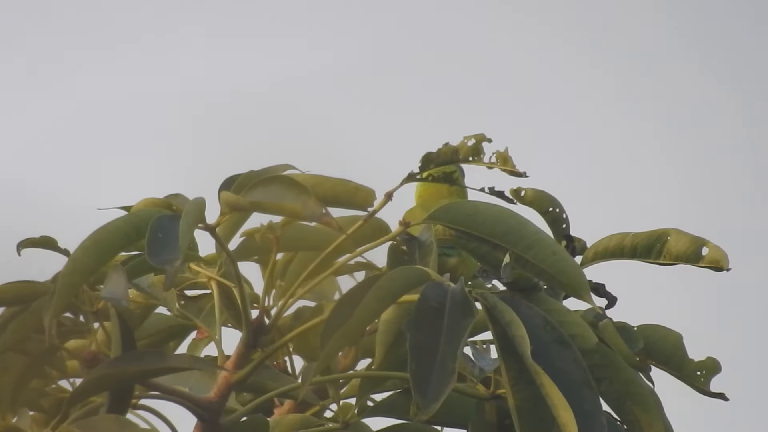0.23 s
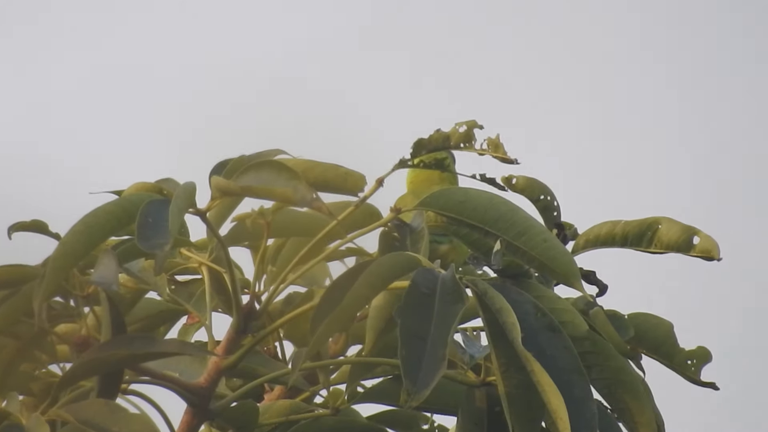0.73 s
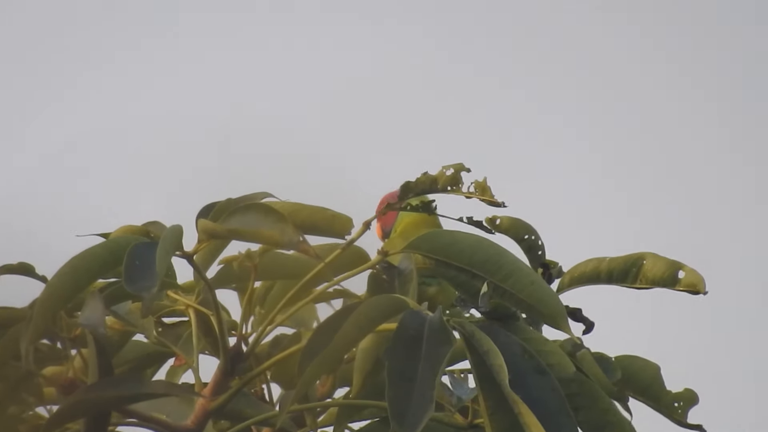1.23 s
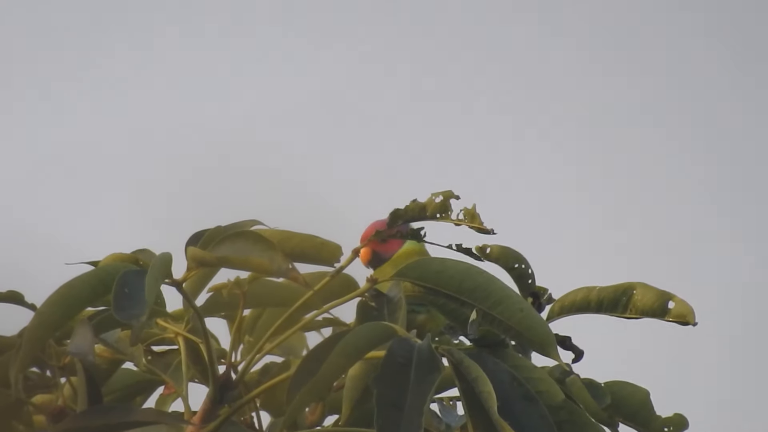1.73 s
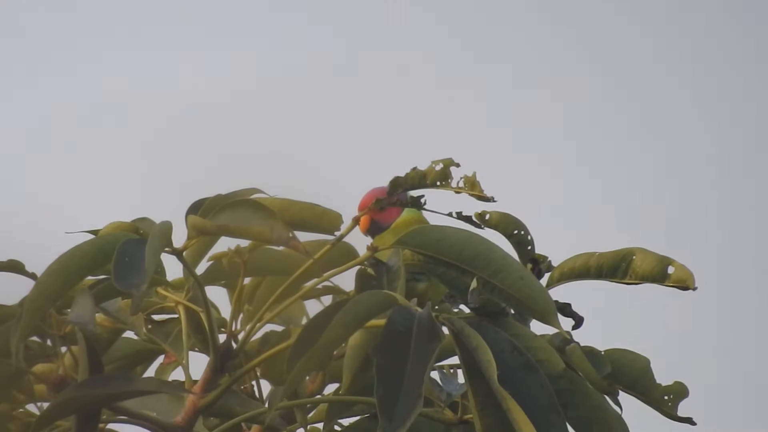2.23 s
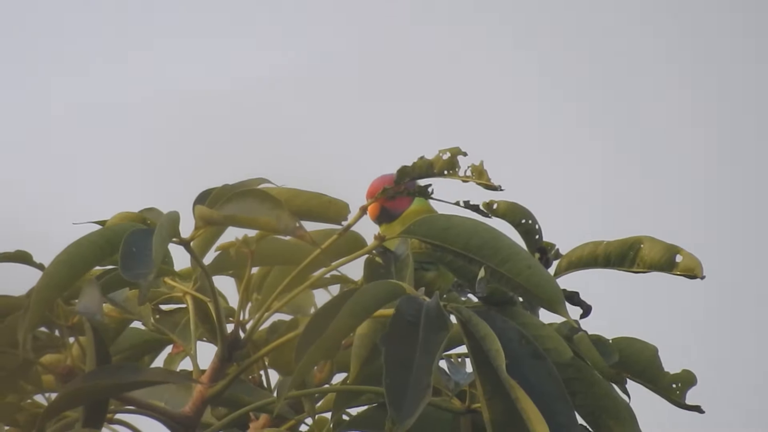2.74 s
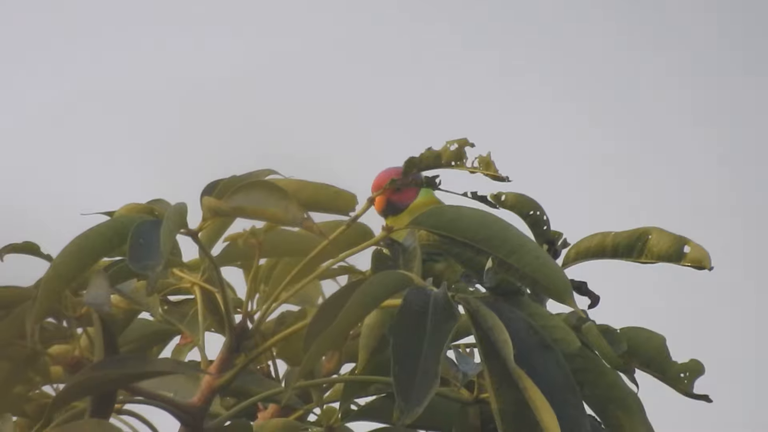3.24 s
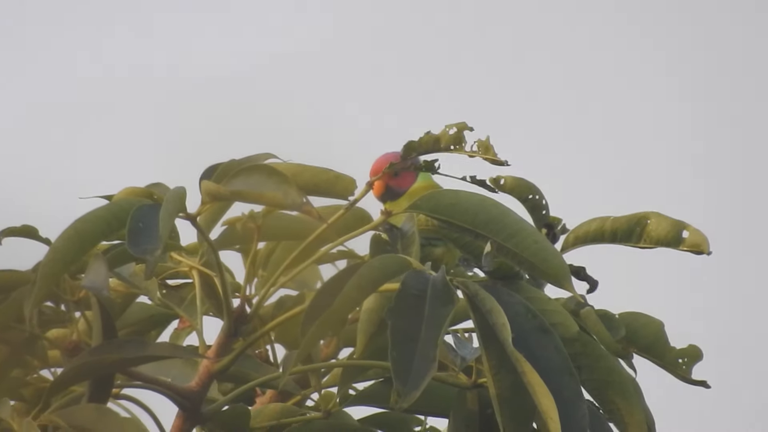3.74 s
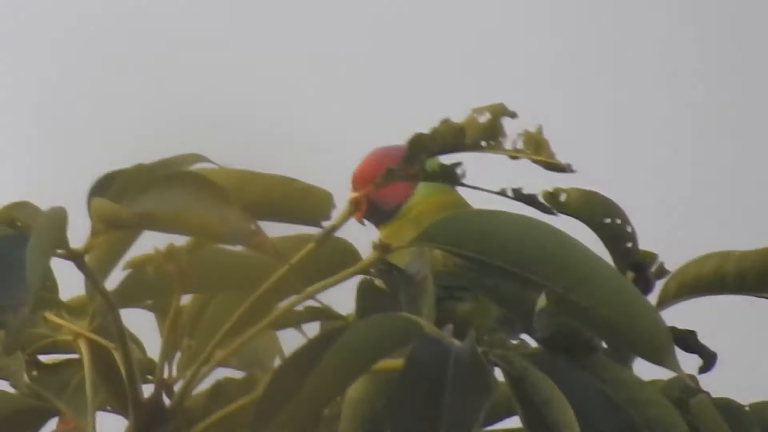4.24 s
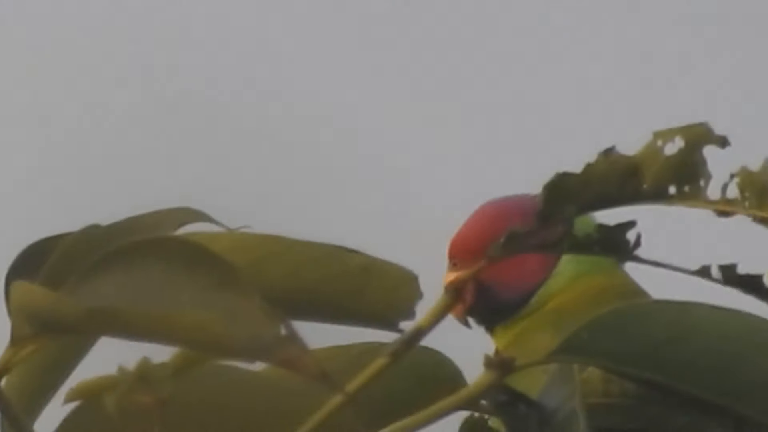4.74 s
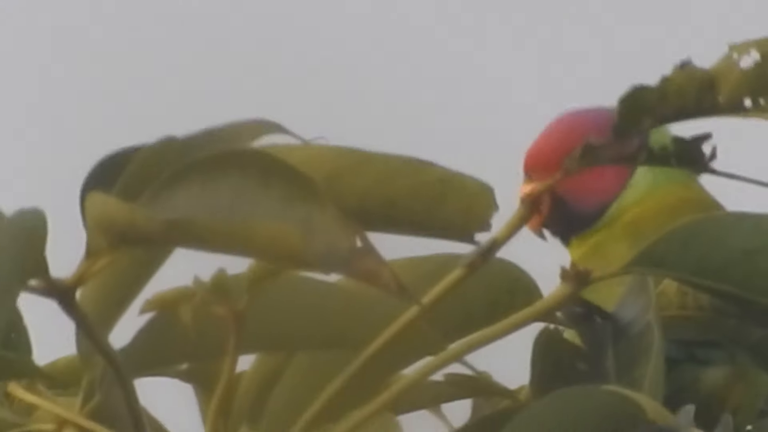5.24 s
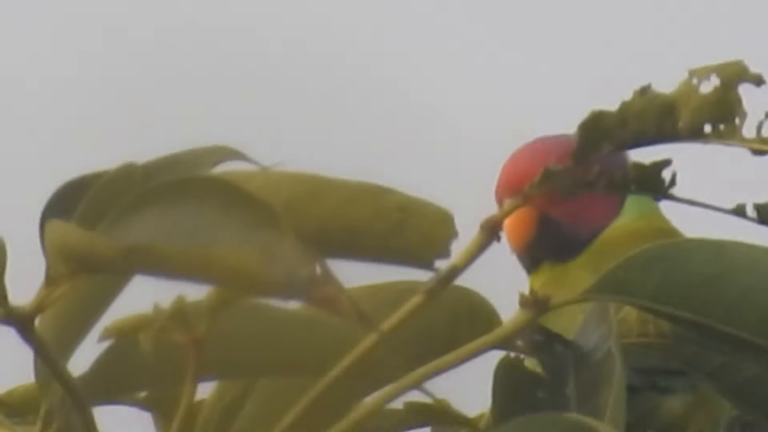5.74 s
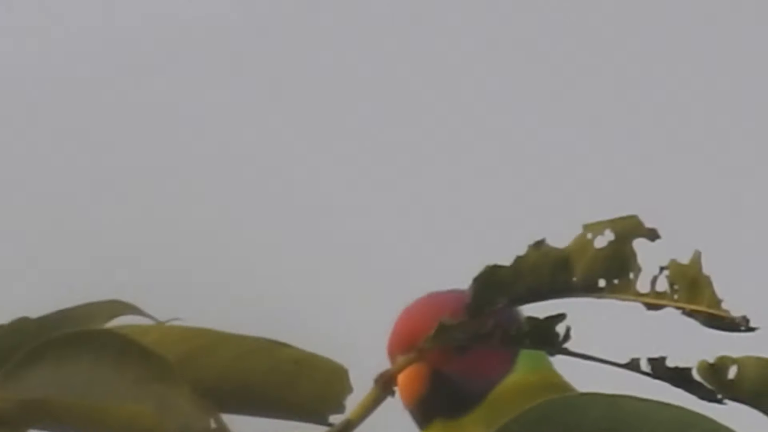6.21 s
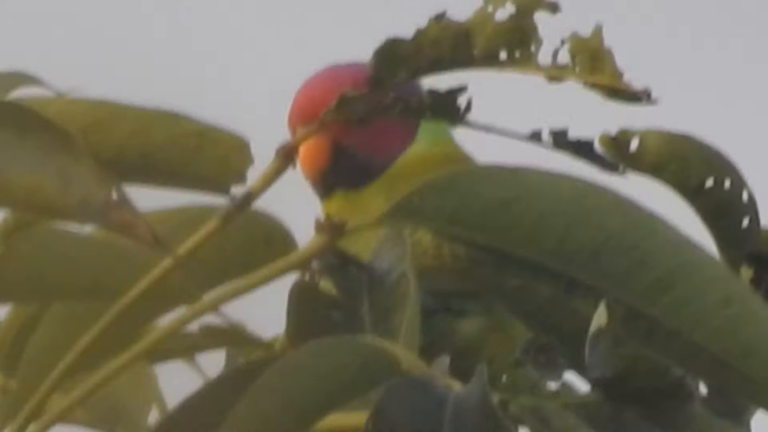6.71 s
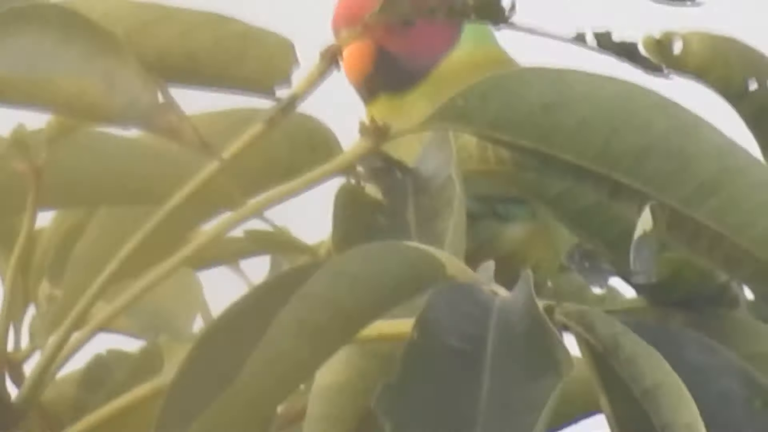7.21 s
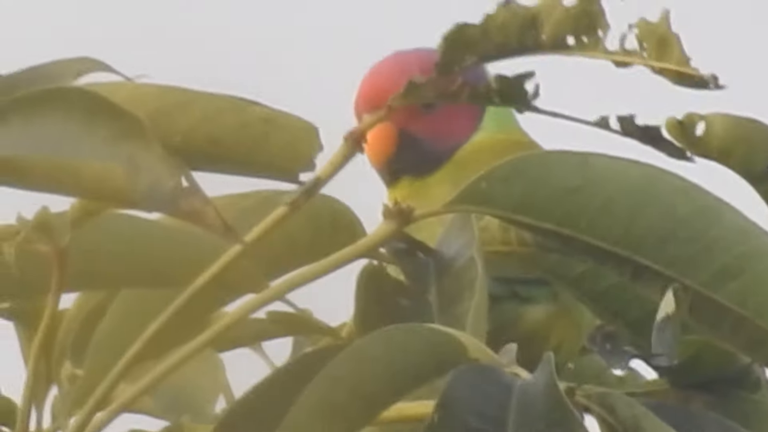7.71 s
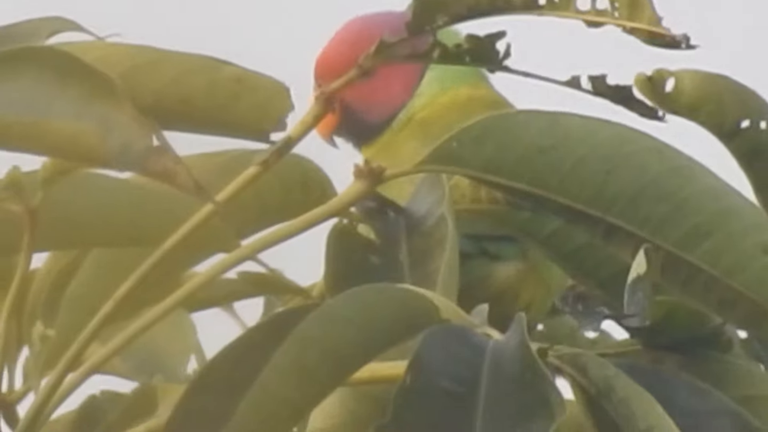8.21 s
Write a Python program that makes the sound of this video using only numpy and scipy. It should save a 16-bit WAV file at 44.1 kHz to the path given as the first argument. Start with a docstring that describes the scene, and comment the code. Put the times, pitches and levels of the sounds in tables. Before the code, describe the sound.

A parakeet calls from a leafy treetop, its short, sharp, rising cries close and fairly dry. A songbird whistles farther off at the start. After one single cry, the cries come mostly in pairs, the second louder, with soft nasal notes, mews and tiny beak clicks between them. Near the end, more distant parakeets reply. Faint chirps, insects and a quiet outdoor hush continue underneath.

```python
"""Parakeets in a treetop. A songbird whistles farther off; at 0.5 s comes the first close cry, the syrinx
swooping up and breaking twice into higher registers. From 2 s the cries come mostly in pairs, the second
forced harder, among distant whines, then soft mews, beak clicks and nasal notes. Near 5 s a bird warbles
twice; from 6.6 s farther parakeets reply. Throughout, foliage scatters every call over faint chirps,
insects and a quiet outdoor hush."""
import sys
import numpy as np
from scipy import signal
from scipy.fft import rfft, irfft, next_fast_len
from scipy.io import wavfile
from scipy.ndimage import map_coordinates

SR = 44100
rng = np.random.default_rng(int(sys.argv[2]) if len(sys.argv) > 2 else 0)


def unload_wav(signal):
    """Save mono or channel-first audio to the path in sys.argv[1] as 16-bit WAV at rate SR, clipped to [-1, 1]."""
    wavfile.write(
        sys.argv[1],
        SR,
        np.round(np.clip(np.atleast_2d(signal).T, -1, 1) * 32767).astype(np.int16),
    )


N = 373086

# close cries (start [s], level [dB], effort [0-1])
CRIES = [(0.456, -10, .05), (2.162, -10, 0), (2.391, -8, 1), (3.865, -10.5, .05), (4.112, -7, 0.94),
         (5.155, -10.5, 0), (5.299, -7.5, 0.99), (6.215, -14.5, 0.4), (6.388, -11, .05), (6.408, -7, 0.81)]
# farther cries (start [s], low register [s], middle register [s], level [dB])
REPLIES = [(6.632, .060, .028, -31.5), (6.908, 0.027, 0.064, -32.5), (7.210, 0.024, .059, -30.5),
           (7.229, 0.032, .037, -36), (7.532, .061, 0.031, -29), (7.875, 0.027, 0.064, -36)]
# parakeet throat and beak response (frequency [Hz], gain [dB])
THROAT = [(900, -33.5), (1700, -19), (2400, -13.5), (2900, -2), (3400, -0.5), (4000, 0), (4500, -2),
          (5300, -1), (6200, -7), (7300, -6.5), (9100, -12.5), (10200, -8.5), (11000, -14.5),
          (12200, -35.5)]
# nasal notes, mews, whines, warbles, thin high whistles (start [s], length [s], pitch [Hz], level [dB])
NASALS = [(3.370, 0.16, 1598, -32), (3.729, 0.16, 1620, -30), (4.120, 0.17, 1644, -30.5),
          (4.507, 0.17, 1642, -29.5), (6.710, 0.16, 1591, -31.5), (7.087, 0.17, 1634, -30)]
MEWS = [(3.005, .128, 1444, -37.5), (6.155, 0.11, 1422, -35.5)]
WHINES = [(2.575, 0.17, 1117, -33.5), (5.720, 0.18, 1076, -34.5)]
WARBLES = [(4.708, 0.092, 2754, -38.5), (4.890, 0.093, 2830, -36.5)]
SEEPS = [(.965, .085, 6150, -57), (1.235, .11, 5650, -55), (3.195, .11, 6300, -56.5),
         (4.838, .085, 6250, -52.5), (5.122, .07, 6150, -55), (8.328, .09, 6350, -52)]
# their contours (position [0-1], pitch [ratio], gain [dB])
NASAL_SHAPE = [(0, 1.05, -8.5), (.08, 0.985, -0.5), (.3, 1.035, -2), (0.599, 1.085, -6.5), (.9, 1.112, -12),
               (1, 1.122, -18.5)]
MEW_SHAPE = [(0, .88, -6), (.14, 1.01, -1), (.3, .92, -5.5), (.44, 1.05, -8.5), (.9, 1.08, -16.5),
             (1, 0.87, -15.5)]
WHINE_SHAPE = [(0, 0.86, -12.5), (0.22, 1, -2), (.55, 1.002, -4.5), (.8, .975, -8.5), (1, .95, -17)]
WARBLE_SHAPE = [(0, 0.91, -18), (.1, 1.02, -5.5), (.25, .97, -1), (.46, 1.085, -0.5), (.68, .9, -7.5),
                (.88, .97, 0), (1, 0.73, -16)]
SEEP_SHAPE = [(0, 1, -8.5), (.22, .99, 1.5), (.55, .93, -5.5), (1, 0.84, -9)]
# harmonics, fundamental first (gain [dB])
NASAL_TONE_DB = [-10, -2.5, -4.5, -4.5, -18, -23.5, -30]
MEW_TONE_DB = [-12, -2, -5.5, -2, -6.5, -22]
WHINE_TONE_DB = [-13.5, -5, -0.5, -9, -13, -17]
# beak clicks (time [s], level [dB])
CLICKS = [(2.994, -39.5), (4.956, -41), (6.141, -38), (7.067, -42.5)]
# songbird phrase (offset [s], length [s], first [Hz], middle [Hz], last [Hz], level [dB], trill [Hz])
PHRASE_NOTES = [(0, 0.027, 2860, 3230, 3650, -34, 125), (0.061, 0.018, 2600, 2440, 3600, -37, -2),
                (0.09, 0.0292, 4160, 4020, 4100, -35.5, 0), (0.112, .036, 4100, 4140, 4200, -45, 280)]
# phrase entries (start [s], gain [dB], swell by the last note [dB])
PHRASES = [(.188, -2, 2.5), (.644, 4, -8.5)]
# downward chirps (start [s], top pitch [Hz], level [dB])
FLICKS = [(.104, 4600, -48.5), (.614, 3060, -38), (1.870, 2750, -50), (3.474, 2450, -49),
          (3.624, 2700, -48.5)]
# slurred whistles (start [s], length [s], first [Hz], last [Hz], level [dB], trill [Hz])
SLURS = [(.050, 0.063, 2550, 3630, -53.5, 10), (0.113, 0.076, 2630, 2560, -47, 10),
         (0.263, .044, 1880, 1440, -46, 10), (0.304, 0.033, 1760, 1980, -44.5, 410),
         (0.444, .062, 2750, 2460, -26, 42), (1.770, 0.041, 2510, 2790, -54, 150),
         (1.920, 0.11, 2900, 3020, -55, 150), (2.338, 0.045, 2580, 2670, -42, 260),
         (2.366, 0.067, 2480, 2320, -28, 70), (2.544, 0.043, 1870, 2250, -37, 110),
         (2.567, 0.084, 1996, 1670, -31, 116), (5.054, 0.065, 1940, 2240, -48.5, 200),
         (5.584, 0.064, 2350, 2150, -46, 5), (7.490, 0.069, 2580, 2500, -52, 5)]
# foliage decay (frequency [Hz], T60 [s])
FOLIAGE_T60 = [(1000, 0.4), (3500, 0.4), (5500, 0.48), (8000, .35), (12000, .2)]
# outdoor hush spectrum (frequency [Hz], relative density [dB])
HUSH_SPECTRUM = [(20, -4), (45, -7.5), (100, -12), (190, -14.5), (340, -21), (690, -24), (1400, -28),
                 (3000, -32.5), (5500, -34.5), (8000, -37.5), (11000, -42), (15500, -42)]

SWOOP_HZ, REPLY_SWOOP_HZ = 2417, 1663  # top of the swoop
SWOOP_S, LOW_S, MIDDLE_S, WHISTLE_S = .021, .036, .058, .033  # stages of an easy cry
REPLY_SWOOP_S, REPLY_WHISTLE_S, REPLY_BUILD_DB_PER_S = .029, .04, 93
FLICK_S, FLICK_RATIO = .017, .62  # ratio: last pitch over first
SLUR_EASE = .64  # share of the glide done at half time
HUSH_DB, TOP_HZ = -46.5, 15780


def cry(times_s, swoop_hz, levels_db, swell_db, mellow_db_oct, dulling, rasp_db, jitter):
    """The syrinx swoops up in a buzzy register, then breaks twice into higher, purer ones."""
    start, swoop, break1, break2, end = times_s
    low_db, middle_db, whistle_db = levels_db
    t = clock(end - start)
    n, jump_s = len(t), .0006
    shift_hz = swoop_hz - SWOOP_HZ
    # (time [s], pitch [Hz], level [dB], overtone slope [dB/octave])
    stages = np.array([
        (start, 900, low_db - swell_db, -9),
        (start + .6 * (swoop - start), .66 * swoop_hz - .12 * shift_hz, low_db - .93 * swell_db, -6),
        (swoop, swoop_hz, low_db + .5, -2.5),
        (break1 - .006, 2930 + .35 * shift_hz, low_db, -3.5),
        (break1 - jump_s, 3120 + .6 * shift_hz, low_db, -7),
        (break1 + jump_s, 3340, middle_db, -10),
        (break1 + .69 * (break2 - break1), 3790, middle_db - 1, -12),
        (break2 - .006, 4250, middle_db - 1.5, -10),
        (break2 - jump_s, 4330, middle_db - 17.5, -12),
        (break2 + jump_s, 5050, whistle_db, -12),
        (break2 + .11 * (end - break2), 5120, whistle_db - 2.5, -12),
        (break2 + .21 * (end - break2), 5430, whistle_db, -15),
        (break2 + .78 * (end - break2), 5490, whistle_db - 10, -16),
        (end, 5450, whistle_db - 21.5, -16)])
    pitch_hz, level_db, slope = (np.interp(start + t, stages[:, 0], column) for column in stages.T[1:])
    pitch_hz *= 1 + jitter * wobble(n, 250) + .0081 * wobble(n, 2500)
    k = np.arange(1, 7)[:, None]
    flutter_db = 2.8 * np.minimum(k - 1, 1) * np.array([wobble(n, 153.4) for _ in k])
    rolloff_db = slope * np.log2(k) - mellow_db_oct * np.log2(np.maximum(k / 2, 1))
    voice = harmonics(pitch_hz, along(THROAT, k * pitch_hz) + rolloff_db + flutter_db)
    # air rasps through the syrinx, fading after the last break
    rasp = noise(n, [(300, -8), (1500, -6), (3500, -3.5), (7500, -2.5), (11000, -10), (15000, -16.5)])
    rasp *= amp(rasp_db + np.interp(start + t, [break2, end], [0, -10]))
    sound = (voice + rasp) * amp(level_db + 1.46 * wobble(n, 152.5))
    # leaves in the way dull a far bird
    sound = filtered(sound, lambda hz: amp(dulling * along([(4500, -.034), (6500, -.9)], hz)))
    return sound * fade(t, .003)


def near_stages(start_s, db, effort):
    """Close cry: effort brings the first break forward and makes the whistle longer and louder."""
    swoop = start_s + SWOOP_S
    break1 = swoop + LOW_S - .003 * effort
    break2 = swoop + LOW_S + MIDDLE_S
    end = break2 + WHISTLE_S + .013 * effort
    low_db, whistle_db = db - 5.5 + .5 * effort, db - 15 + 10 * effort
    return (start_s, swoop, break1, break2, end), SWOOP_HZ, (low_db, db, whistle_db)


def reply_stages(start_s, low_s, middle_s, db):
    """Reply: a slower, lower swoop; the longer the low register, the louder it is."""
    times_s = start_s + np.cumsum([0, REPLY_SWOOP_S, low_s, middle_s, REPLY_WHISTLE_S])
    low_db = db - 1.5 + REPLY_BUILD_DB_PER_S * (low_s - REPLY_SWOOP_S)
    return times_s, REPLY_SWOOP_HZ, (low_db, db, db - 2)


def parakeets(calls, spread_s, scatter_db, **voice):
    """Cries from one distance, each scattered on its own."""
    out = np.zeros(N)
    for times_s, swoop_hz, levels_db in calls:
        add(out, times_s[0], scatter(cry(times_s, swoop_hz, levels_db, **voice), spread_s, scatter_db))
    return out


def bird_notes(rows, shape, tone_db, tilt_db_oct, jitter, quaver=0, quaver_hz=85):
    """Notes on one contour; upper overtones and quaver die away as the pressure drops."""
    out = np.zeros(N)
    position, ratio, contour_db = np.transpose(shape)
    octaves = np.log2(np.arange(1, len(tone_db) + 1))[:, None]
    for start_s, length_s, hz, db in rows:
        t = clock(length_s)
        u = t / length_s
        shake = quaver * np.sin(2 * np.pi * quaver_hz * t) + jitter * wobble(len(t), 900)
        pitch_hz = hz * np.interp(u, position, ratio) * (1 + shake * np.clip(3.8 * (.62 - u), .08, 1))
        flutter_db = .99 * octaves * np.array([wobble(len(t), 60) for _ in tone_db])
        partials_db = np.array(tone_db)[:, None] - tilt_db_oct * u * (octaves - 1) + flutter_db
        envelope = amp(db + np.interp(u, position, contour_db) + .83 * wobble(len(t), 70))
        add(out, start_s, harmonics(pitch_hz, partials_db) * envelope * fade(t, .0035))
    return out


def beak_clicks():
    """Tiny dry bursts of noise."""
    out, t = np.zeros(N), clock(.03)
    for time_s, db in CLICKS:
        burst = noise(len(t), [(600, -25), (1700, 5), (7000, -1.5), (11000, -25)])
        add(out, time_s - .002, burst * amp(db - 60 * t / .038) * fade(t, .002))
    return out


def songbirds(rows, trill_rate_hz=135):
    """Pure gliding whistles, some with a fast trill."""
    out = np.zeros(N)
    for start_s, length_s, *pitches_hz, db, trill_hz in rows:
        t = clock(length_s)
        glide_hz = np.polyval(np.polyfit([0, .5, 1], pitches_hz, 2), t / length_s)
        pitch_hz = glide_hz * (1 + .011 * wobble(len(t), 330))
        pitch_hz += trill_hz * np.sin(2 * np.pi * trill_rate_hz * t)
        envelope = amp(db + 2 * wobble(len(t), 150)) * fade(t, .26 * length_s)
        add(out, start_s, np.sin(2 * np.pi * np.cumsum(pitch_hz) / SR) * envelope)
    return out


def song():
    """Songbird rows: the repeated phrase, falling flicks, slurs that level off."""
    phrases = [(start_s + s, length_s, *pitches_hz, gain_db + db + swell_db * s / PHRASE_NOTES[-1][0], trill)
               for start_s, gain_db, swell_db in PHRASES
               for s, length_s, *pitches_hz, db, trill in PHRASE_NOTES]
    flicks = [(s, FLICK_S, hz, hz * np.sqrt(FLICK_RATIO), hz * FLICK_RATIO, db, 0)
              for s, hz, db in FLICKS]
    slurs = [(s, length_s, first, first + SLUR_EASE * (last - first), last, db, trill)
             for s, length_s, first, last, db, trill in SLURS]
    return phrases + flicks + slurs


def twitter(base_db, count=34):
    """Songbird rows: faint random chirps deep in the trees."""
    draws = rng.uniform([.5, .012, 1504.5, -.18, 1], [N / SR, .04, 2500, .18, 2], (count, 5))
    return [(s, length_s, hz * (1 - tilt), hz * 1.04, hz * (1 + tilt), base_db + lift_db, 0)
            for s, length_s, hz, tilt, lift_db in draws]


def scatter(sound, spread_s, db, count=10):
    """Nearby leaves and branches return weak late copies that beat with a gliding call."""
    out = np.pad(sound, (0, SR // 4))
    for delay, size in rng.uniform([0, -1], [1, 1], (count, 2)):
        add(out, delay * spread_s, amp(db) * size * sound)
    return out


def foliage(x):
    """Leaves and trunks scatter a thin tail; the top treble dies first."""
    hz, t, spectra = signal.stft(rng.standard_normal(SR), SR, nperseg=256)
    decay_db = -60 * t / along(FOLIAGE_T60, hz)[:, None]
    colour = [(1000, -8.5), (3000, -2), (4000, -3), (5500, -3), (6500, 3.5), (8000, -6), (12000, -15)]
    envelope = amp(decay_db + along(colour, hz)[:, None]) * (1 - np.exp(-t / .0027))
    tail = signal.istft(spectra * envelope, SR, nperseg=256)[1]
    return signal.fftconvolve(x, 2 * tail / np.linalg.norm(tail))[:N]


def hush():
    """Distant rumble, soft hiss and a steady band of insects."""
    air = amp(HUSH_DB + .34 * wobble(N, 2)) * noise(N, HUSH_SPECTRUM)
    insects = noise(N, [(4500, -44), (6100, -3.5), (6800, -2.5), (7500, -7.5), (9500, -37)])
    return air + amp(-65.5 + .8 * wobble(N, 9.1)) * insects


def harmonics(pitch_hz, level_db):
    """Harmonic stack; one level row per harmonic."""
    k = np.arange(1, len(level_db) + 1)[:, None]
    phase = 2 * np.pi * np.cumsum(pitch_hz) / SR
    return np.sum(amp(level_db) * (k * pitch_hz < SR / 2) * np.sin(k * phase), axis=0)


def noise(n, spectrum):
    """Noise of rms 1, coloured by (frequency [Hz], gain [dB]) points."""
    x = filtered(rng.standard_normal(n), lambda hz: amp(along(spectrum, hz)))
    return x / np.sqrt(np.mean(x ** 2) + 1e-20)


def filtered(x, response):
    """Apply the gain response(hz)."""
    m = next_fast_len(len(x) + 8192)
    return irfft(rfft(x, m) * response(np.fft.rfftfreq(m, 1 / SR)), m)[:len(x)]


def wobble(n, rate_hz):
    """Smooth random curve, rate_hz knots a second."""
    return map_coordinates(rng.standard_normal(int(n * rate_hz / SR) + 4), [np.arange(n) * rate_hz / SR])


def along(points, hz):
    """Read (frequency [Hz], value) points on a log axis."""
    knots_hz, values = np.transpose(points)
    return np.interp(np.log(hz + 1), np.log(knots_hz), values)


def amp(db):
    """Decibels to gain."""
    return 10 ** (np.asarray(db) / 20)


def clock(length_s):
    """Sample times [s]."""
    return np.arange(int(length_s * SR)) / SR


def fade(t, edge_s):
    """Soft start and end."""
    return np.sin(np.pi / 2 * np.clip(np.minimum(t, t[-1] - t) / edge_s, 0, 1))


def add(track, start_s, sound):
    """Mix a sound into the track."""
    part = track[round(start_s * SR):][:len(sound)]
    part += sound[:len(part)]


def scene():
    """Near birds sound dry, far ones have more echo."""
    near = parakeets([near_stages(*row) for row in CRIES], spread_s=.013, scatter_db=-20.5,
                     swell_db=5, mellow_db_oct=4, dulling=-1, rasp_db=-30, jitter=.006)
    replies = parakeets([reply_stages(*row) for row in REPLIES], spread_s=.031, scatter_db=-17,
                        swell_db=1.5, mellow_db_oct=8, dulling=10, rasp_db=-21, jitter=.011)
    nasals = bird_notes(NASALS, NASAL_SHAPE, NASAL_TONE_DB, tilt_db_oct=11, jitter=.011)
    mews = bird_notes(MEWS, MEW_SHAPE, MEW_TONE_DB, tilt_db_oct=12.5, jitter=.008)
    soft = nasals + mews + beak_clicks()
    whines = bird_notes(WHINES, WHINE_SHAPE, WHINE_TONE_DB, tilt_db_oct=5.5, jitter=.017,
                        quaver=.048, quaver_hz=80.7)
    whistles = songbirds(song())
    warbles = bird_notes(WARBLES, WARBLE_SHAPE, [0], tilt_db_oct=-3, jitter=.034)
    far = scatter(whistles + warbles, spread_s=.073, db=-16.5)[:N]
    seeps = bird_notes(SEEPS, SEEP_SHAPE, [0], tilt_db_oct=2, jitter=.01)
    chatter = scatter(songbirds(twitter(base_db=-55)) + seeps, spread_s=.048, db=-17.5)[:N]
    echo = foliage(amp(-31.5) * near + amp(-19.5) * replies + amp(-26.5) * soft
                   + amp(-25.5) * whines + amp(-16.5) * far + amp(-15) * chatter)
    return (near + replies + soft + whines + far + chatter + echo + hush())[None]


def record(dry):
    """Brick-wall low-pass at TOP_HZ."""
    return np.array([filtered(channel, lambda hz: hz < TOP_HZ) for channel in dry])


dry = scene()
out = record(dry)
unload_wav(out)
```